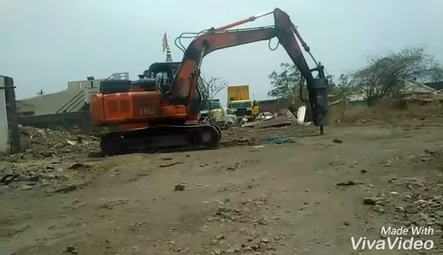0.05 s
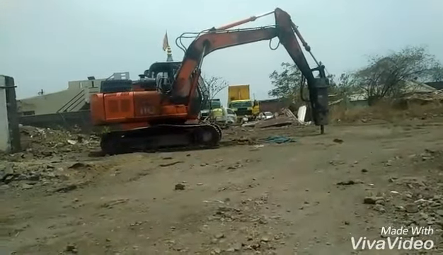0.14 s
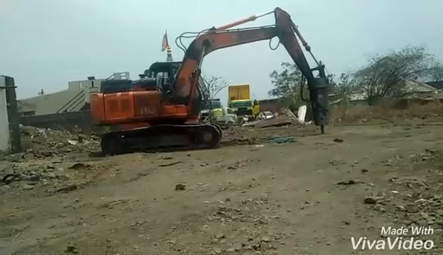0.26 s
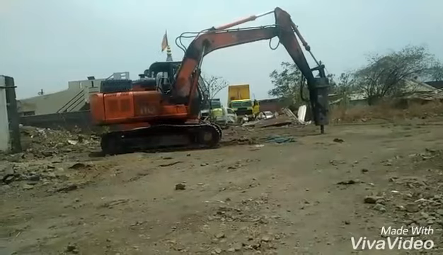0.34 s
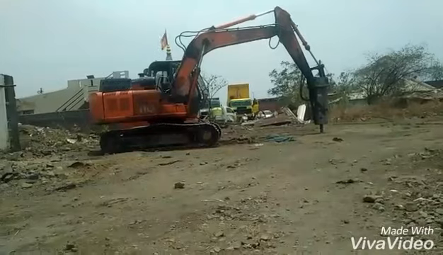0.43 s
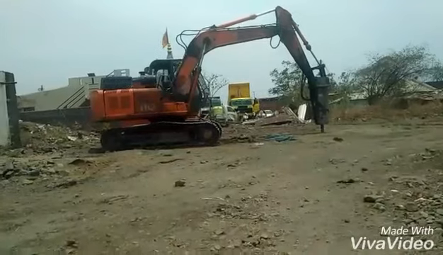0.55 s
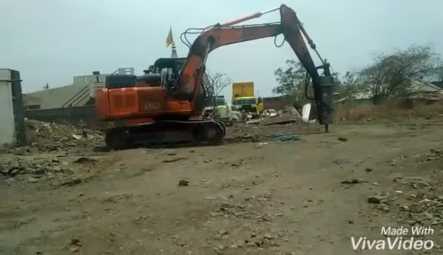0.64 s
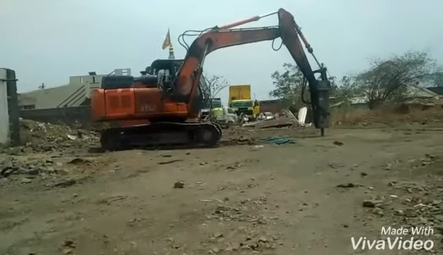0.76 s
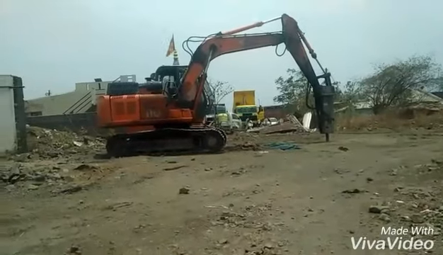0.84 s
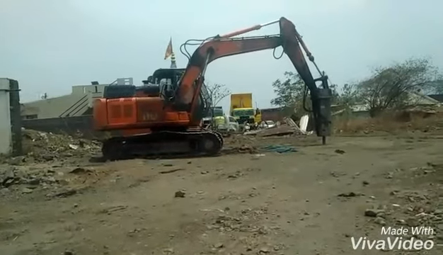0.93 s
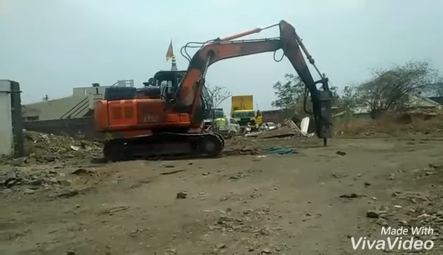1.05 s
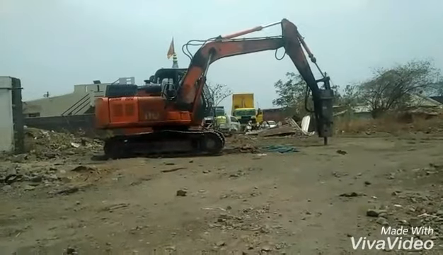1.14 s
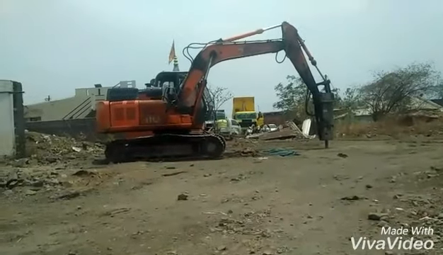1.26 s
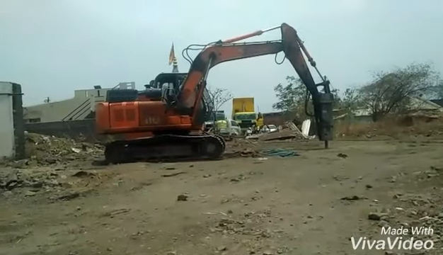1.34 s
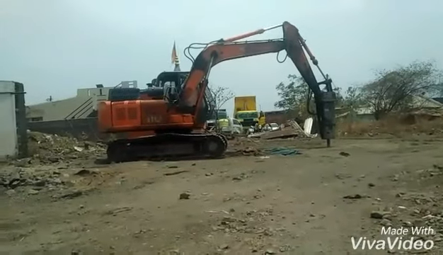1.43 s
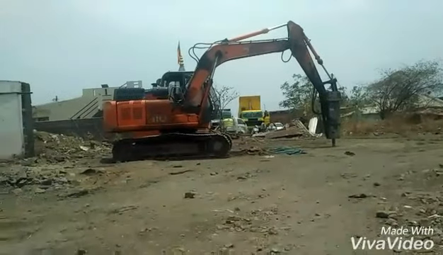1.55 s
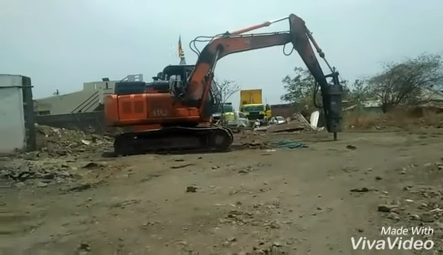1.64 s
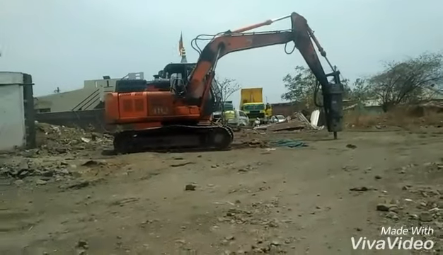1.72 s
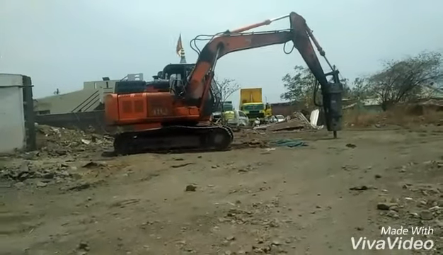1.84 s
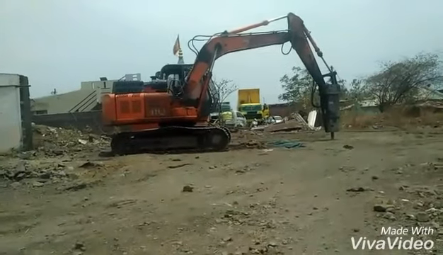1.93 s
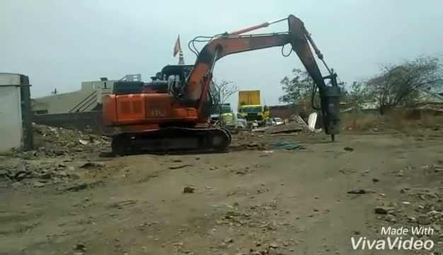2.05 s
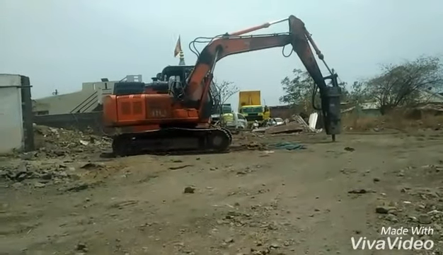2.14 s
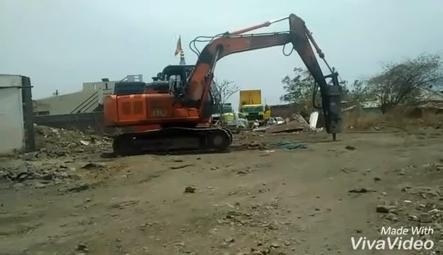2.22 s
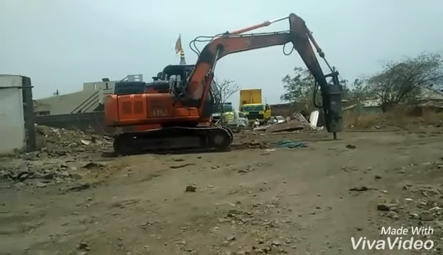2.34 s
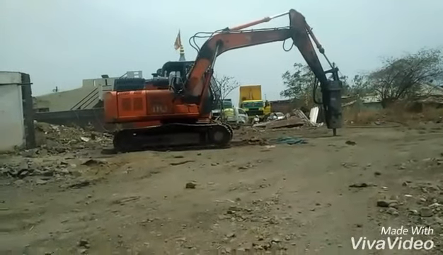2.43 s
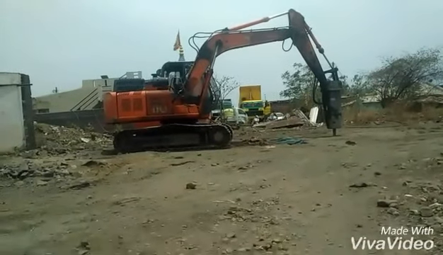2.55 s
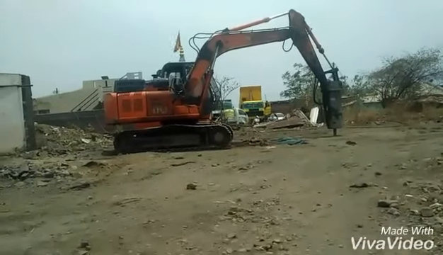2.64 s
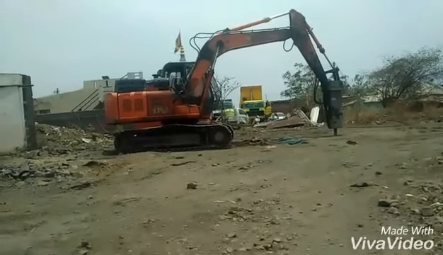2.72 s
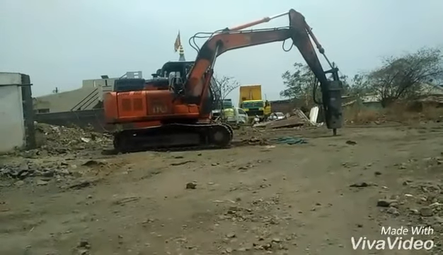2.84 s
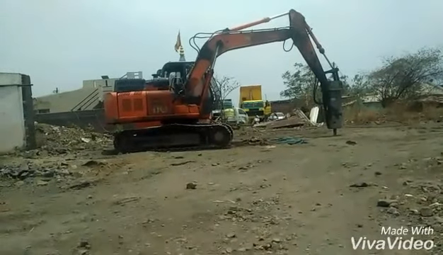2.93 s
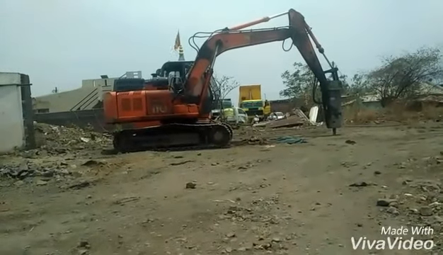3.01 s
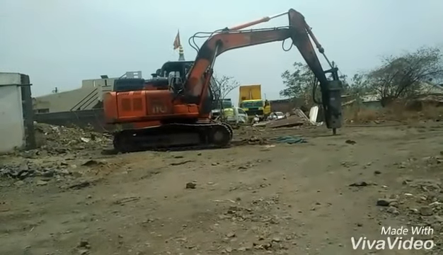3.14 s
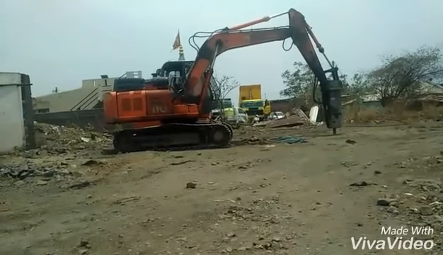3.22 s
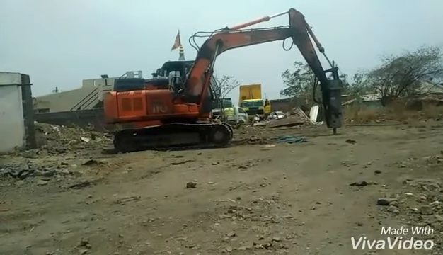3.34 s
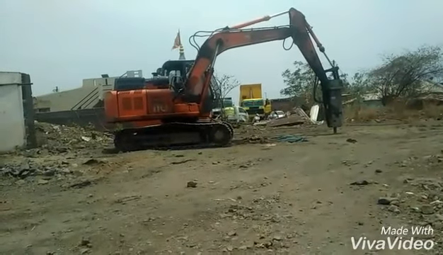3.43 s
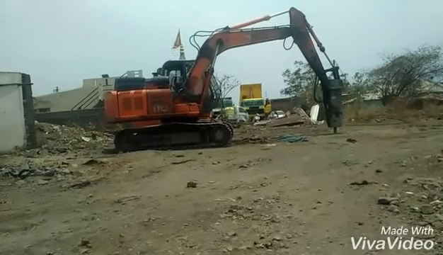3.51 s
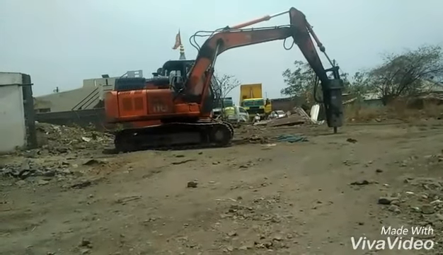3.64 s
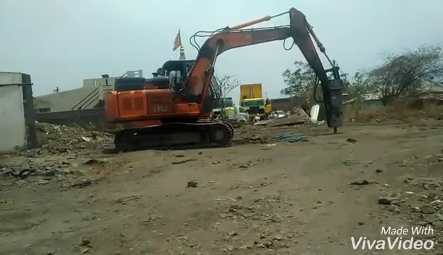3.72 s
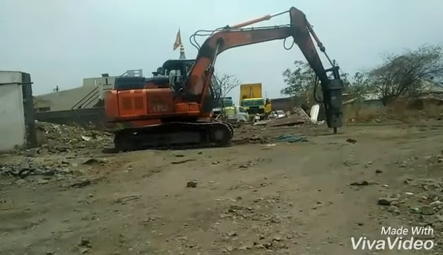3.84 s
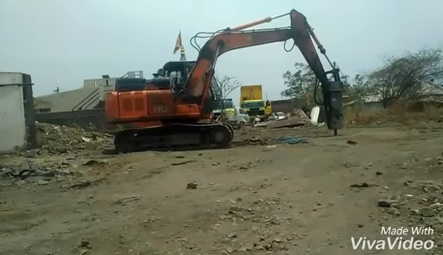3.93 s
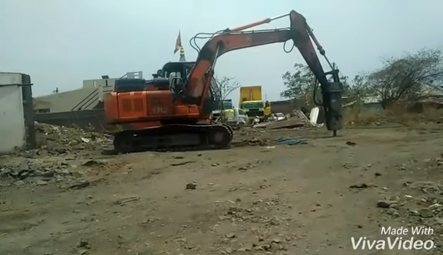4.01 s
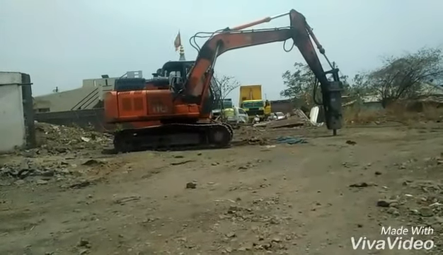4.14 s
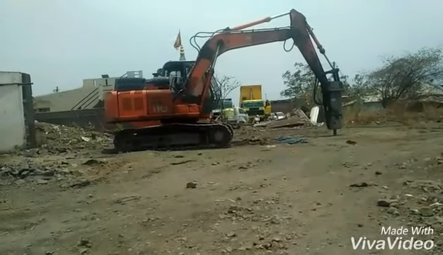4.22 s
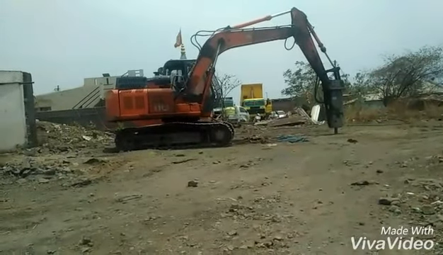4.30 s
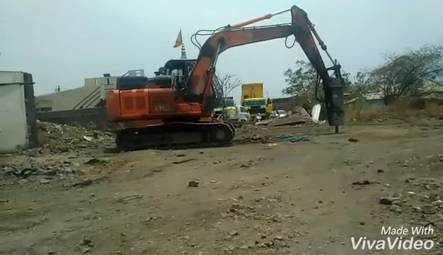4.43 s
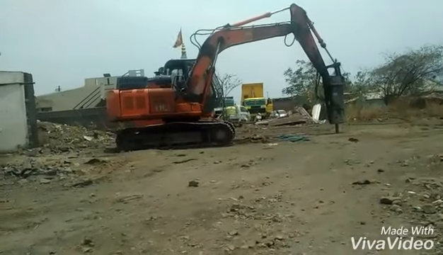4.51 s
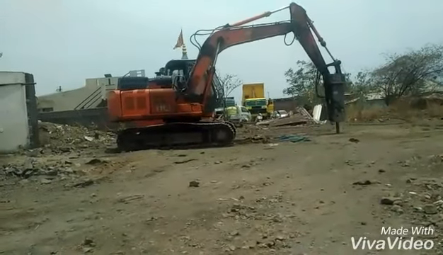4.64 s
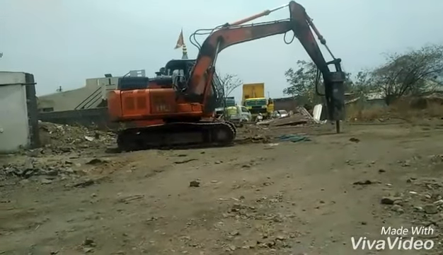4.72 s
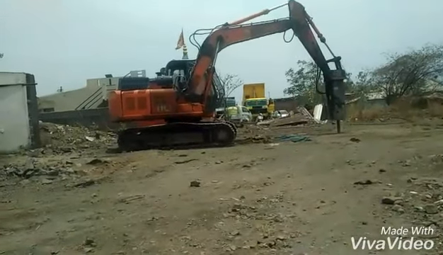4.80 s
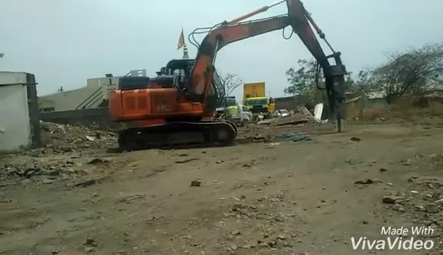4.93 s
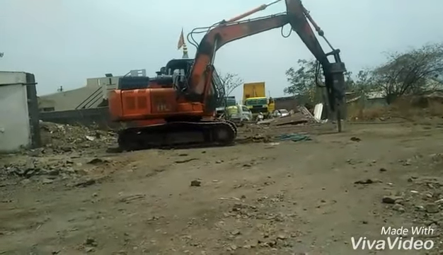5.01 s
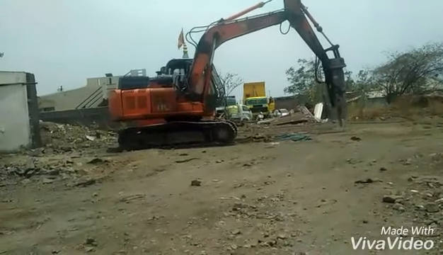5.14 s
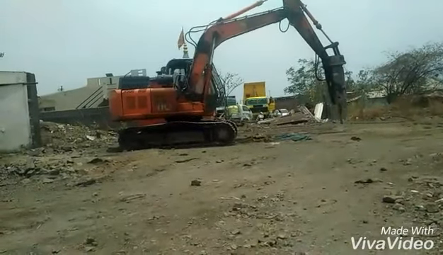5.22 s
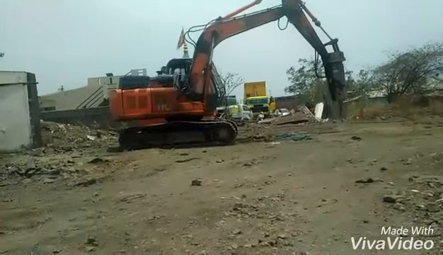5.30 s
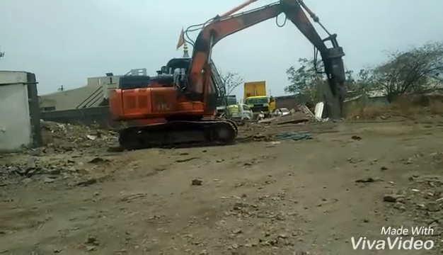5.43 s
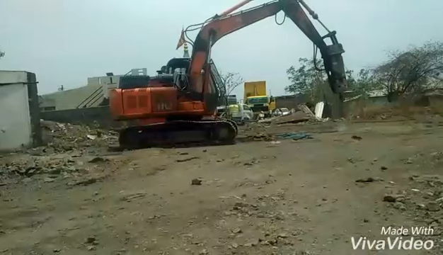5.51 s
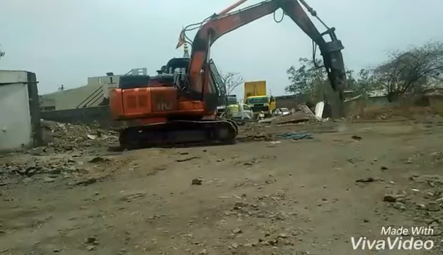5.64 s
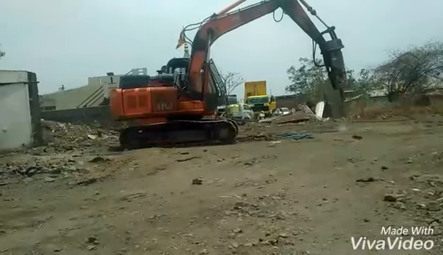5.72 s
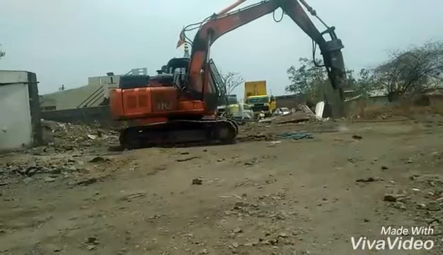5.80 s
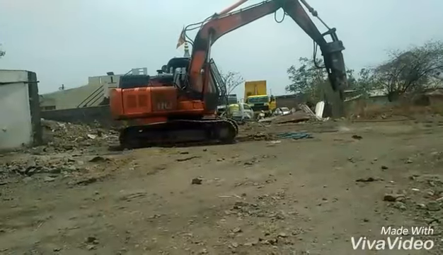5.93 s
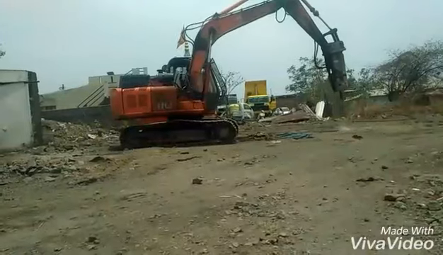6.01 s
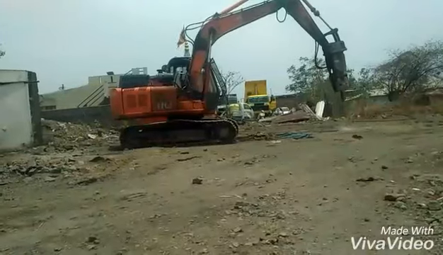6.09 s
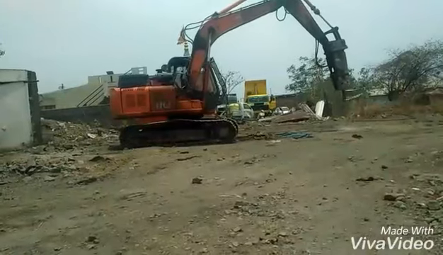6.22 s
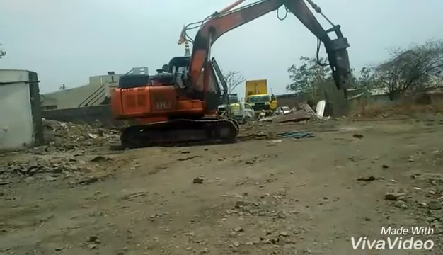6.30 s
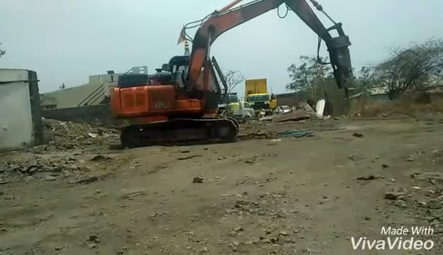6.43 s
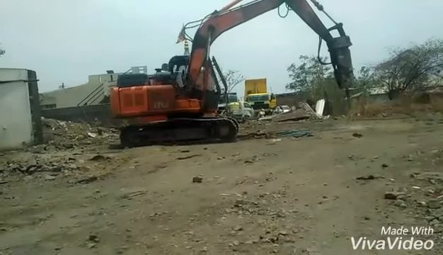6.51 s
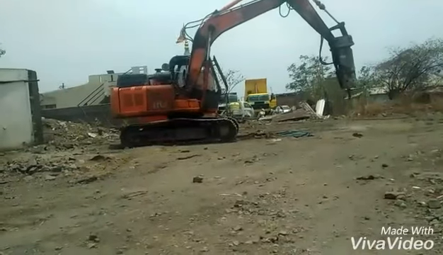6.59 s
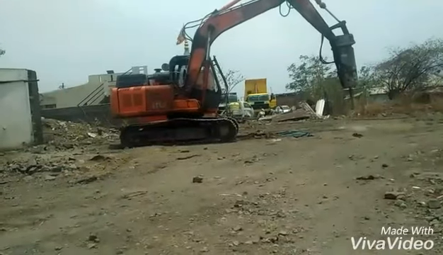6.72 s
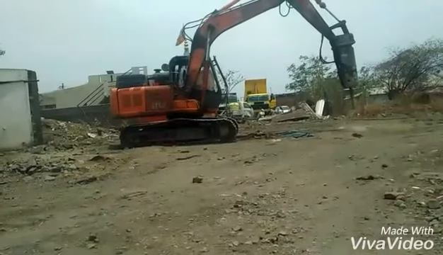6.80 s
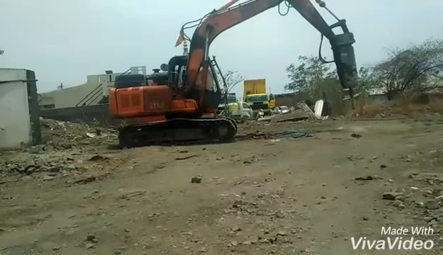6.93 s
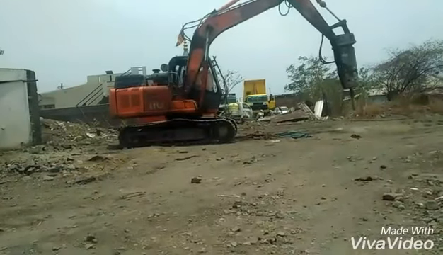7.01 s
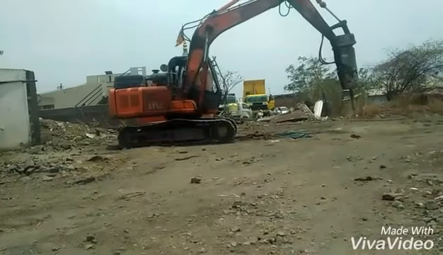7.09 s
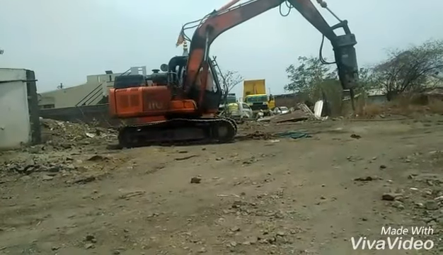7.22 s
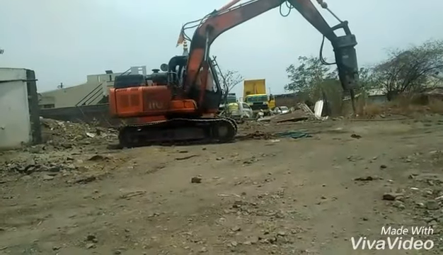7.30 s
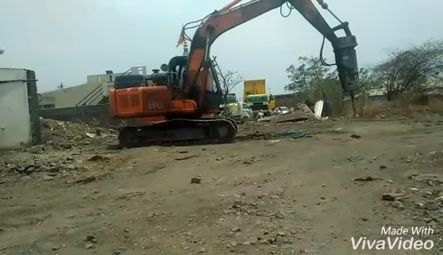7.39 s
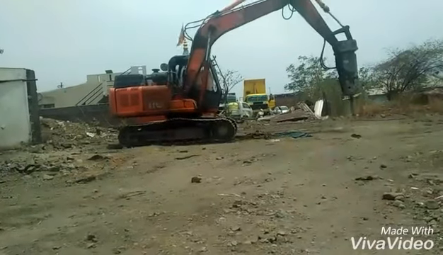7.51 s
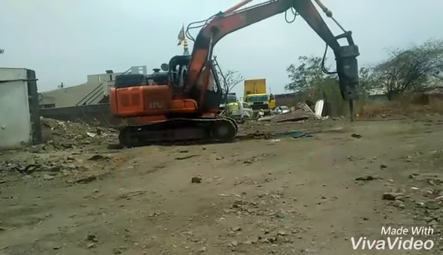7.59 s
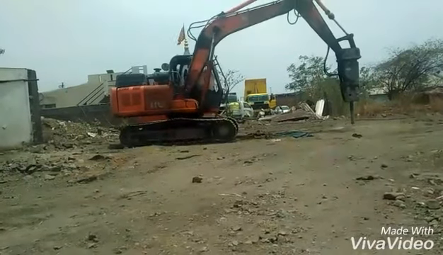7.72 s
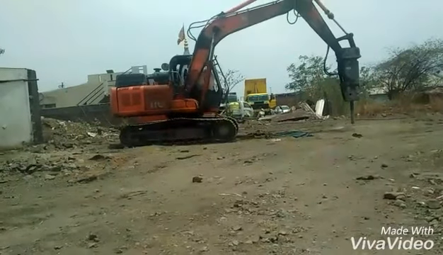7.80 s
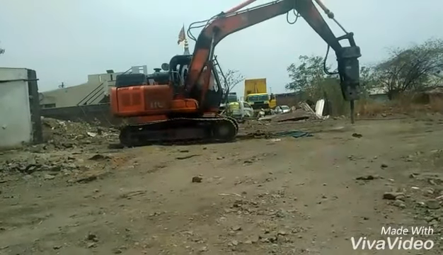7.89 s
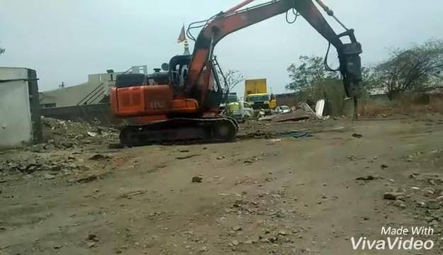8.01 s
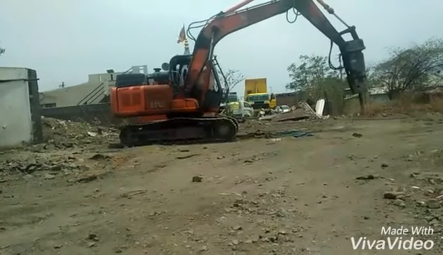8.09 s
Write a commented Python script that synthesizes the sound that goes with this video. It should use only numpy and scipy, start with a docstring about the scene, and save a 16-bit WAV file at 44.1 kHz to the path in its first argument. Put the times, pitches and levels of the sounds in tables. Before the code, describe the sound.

Outdoors on open rubble ground, an excavator's breaker pounds about seven times a second, each loud blow a bright tick, steel crash and short ringing rebound. It pauses briefly, leaving the diesel drone, then hammers again. Afterwards the arm lifts with clanks, the engine growls under load, hisses and whines. One distant microphone, about twenty metres away, with peaks squashed.

```python
"""Hydraulic breaker at twenty metres

A hydraulic breaker on an excavator pounds the ground some twenty metres from the microphone, in two bursts.
Each cycle is a bright valve tick, the blow on the steel and a rebound, built from ringing modes.
Arm and casing ring on, and a broad crash of filtered noise dies away into the echo of the site.
Behind it the diesel drones in sine orders, with a puff of hiss and a knock at every firing.
Loose steel clanks while the arm is raised; a fast limiter ducks everything under each blow."""
import sys
import numpy as np
from scipy import signal
from scipy.fft import rfft, irfft
from scipy.io import wavfile

SR = 44100
rng = np.random.default_rng(int(sys.argv[2]) if len(sys.argv) > 2 else 0)


def master_out(mix):
    """Clip the mix to full scale and print it as 16-bit PCM to the path in sys.argv[1]."""
    frames = np.transpose(np.atleast_2d(mix))
    ceiling = np.clip(frames, -1, 1)
    pcm = np.round(ceiling * 32767).astype(np.int16)
    wavfile.write(sys.argv[1], SR, pcm)


N = 359415

# Piston on tool; bite is how deep the tool sits in the ground.
# Columns: t/s, relative peak level/dB, bite (0-1), low ring level/dB, relative rebound level/dB
BLOWS = [(-0.089, -1, 0, -12, -14), (0.056, -2.5, 0.06, -8, -5), (0.202, -3.5, 0, 1, -9),
         (0.348, -3, 0.03, 7.5, -15), (0.493, -2.5, 0.1, -1, -3), (0.639, -3, 0, 10.5, -21),
         (0.784, -3.5, 0.04, 8, -24), (0.929, -4.5, 0.03, -7, -31), (1.074, -3.5, 0.09, 5, -26),
         (1.221, -4, 0, 3, -8), (1.366, -3.5, 0, 0, -16), (1.511, -3.5, 0.04, 5, -10),
         (1.658, -4.5, 0.06, 4, -14), (1.803, -3, 0.17, 3.5, -3), (1.949, -4, 0.08, 2.5, -9),
         (2.096, -4.5, 0.17, -3.5, -3), (2.787, -4.5, 0.2, 11, -12), (2.935, -3.5, 0.48, -1, -5),
         (3.081, -4.5, 0.7, 3, 1), (3.227, -6.5, 0.83, -1, -6), (3.372, -7, 1, -12, -2),
         (3.52, -7, 0.9, -13, -3), (3.665, -5, 0.83, -3, -1.5), (3.813, -4.5, 0.55, 6.5, -1),
         (3.958, -3.5, 0.36, 10, -3), (4.104, -4.5, 0.13, 8.5, -7)]


def from_db(db):
    """Decibels to gain."""
    return 10 ** (np.asarray(db) / 20)


def rms_one(x):
    """Scale to unit rms."""
    return x / np.sqrt(np.mean(x ** 2) + 1e-20)


def in_time(rows):
    """Columns of a curve table, one value per sample."""
    s, *columns = np.transpose(rows)
    return [np.interp(np.arange(N) / SR, s, column) for column in columns]


def at_hz(points, hz):
    """Read a table on a log-frequency axis."""
    table_hz, values = np.transpose(points)
    return np.interp(np.log(hz), np.log(table_hz), values)


def bandpass(x, order, low_hz, high_hz):
    """Butterworth band between two edges."""
    return signal.sosfilt(signal.butter(order, [low_hz, high_hz], "band", fs=SR, output="sos"), x)


def drift(rate_hz):
    """Slow chance of spread 1: noise through a two-pole lowpass, drawn at every 40th sample."""
    step = 40
    r = np.exp(-2 * np.pi * rate_hz * step / SR)
    white = rng.standard_normal(N // step + 2002)
    slow = signal.lfilter([1], [1, -2 * r, r * r], white)[2000:]   # skip the run-in
    return np.interp(np.arange(N) / step, np.arange(len(slow)), rms_one(slow))


def shaped(white, spectrum):
    """White noise given a spectrum, closed outside its ends, at unit rms."""
    length = white.shape[-1]
    hz = np.maximum(np.fft.rfftfreq(length, 1 / SR), 1)
    inside = (hz > spectrum[0][0]) & (hz < spectrum[-1][0])
    return rms_one(irfft(rfft(white) * from_db(at_hz(spectrum, hz)) * inside, length))


def patchy(x, edges_hz, depth_db):
    """Split into bands that each swell and sink on their own."""
    mixed = 0
    for k, (low, high) in enumerate(zip(edges_hz, edges_hz[1:])):
        sign = (-1) ** k   # alternate signs keep the crossovers level
        mixed = mixed + sign * from_db(depth_db * drift(9.3)) * bandpass(x, 2, low, high)
    return mixed


def ring(push, hz, t60):
    """A damped mode: a unit click sets a sine of height 1 ringing."""
    r, w = from_db(-60 / (t60 * SR)), 2 * np.pi * hz / SR
    return signal.lfilter([0, np.sin(w)], [1, -2 * r * np.cos(w), r * r], push + 1e-18)


def struck(push, hz, t60):
    """Rows of an uneven push through one mode, each scaled to a height of 1."""
    rung = ring(push, hz, t60)
    return rung / np.abs(rung).max(axis=-1, keepdims=True)


def place(times, sounds):
    """Lay one sound per row at its time; a sound may have begun up to a second ago."""
    out = np.zeros(SR + N + sounds.shape[1])
    for s, sound in zip(times, sounds):
        start = SR + round(s * SR)
        out[start:start + len(sound)] += sound
    return out[SR:SR + N]


def firing_window(cycles, width):
    """A bell in each firing cycle, centred on the pressure dip half a cycle in."""
    return np.exp(-.5 * ((cycles % 1 - .5) / width) ** 2)


def firing_strength(cycles, spread_db):
    """One chance gain per firing, held for its whole cycle."""
    firing = cycles.astype(int)
    return from_db(spread_db * rng.standard_normal(firing[-1] + 1))[firing]


def firing_cycles():
    """Firings counted since the start: the diesel sags under load and is slightly unsteady."""
    # Columns: t/s, firing rate/Hz
    speed_curve = [(0, 84.6), (2.0, 84.7), (2.25, 87.4), (2.55, 88.8), (2.85, 85.8), (4.05, 85.7),
                   (4.35, 88.6), (4.65, 85.3), (4.95, 80.8), (5.25, 83.2), (5.55, 82.9), (6.15, 83.6),
                   (6.45, 83.1), (7.05, 83.8), (7.65, 86.9), (7.95, 83.6), (8.15, 82)]
    (speed,) = in_time(speed_curve)
    return np.cumsum(speed * (1 + 0.00186 * drift(2.54))) / SR


def fan_hiss():
    """Steady faint treble of the cooling fan, as shaped noise."""
    spectrum = [(5000, -6), (6500, -2), (8500, 2.5), (11000, -5), (12800, -20)]   # f/Hz, relative level/dB
    return from_db(-65) * shaped(rng.standard_normal(N), spectrum)


def engine_rumble(swing_db):
    """Low noise of the engine, which partly follows the load and wavers."""
    # Columns: f/Hz, relative level/dB per Hz
    spectrum = [(12, -53), (20, -10), (37, -5.5), (86, -12), (129, -12.5), (172, 1), (274, 1), (335, -4.5),
                (375, -20.5), (436, -3.5), (520, -50), (680, -51), (1140, -120)]
    level_db = -43.5 + 0.31 * swing_db + 2.66 * drift(6.1)
    return from_db(level_db) * shaped(rng.standard_normal(N), spectrum)


def panel_clatter(cycles):
    """Engine and panels clatter in time with the firings, shaken harder while the breaker runs."""
    # Columns: f/Hz, relative level/dB per Hz
    spectrum = [(220, -9), (380, -74), (436, 3.5), (516, -6), (765, -2.5), (827, -6.5), (1120, -1.5),
                (1440, -1.5), (1550, -2), (1950, -11.5), (2170, -7), (3160, -21), (4000, -28),
                (5200, -15.5), (8800, -120)]
    # Columns: t/s, level/dB
    level_curve = [(0, -34), (2.15, -36.5), (2.32, -46), (2.72, -46), (2.85, -32.5), (4.15, -33),
                   (4.32, -43.5), (4.6, -45), (4.95, -38), (5.36, -43.5), (5.8, -41.5), (6.25, -39.5),
                   (6.47, -35), (6.67, -40.5), (7.06, -40), (7.2, -38.5), (7.8, -39.5), (8.15, -35.5)]
    beat = 1 + .5 * firing_window(cycles, 0.65) * firing_strength(cycles, 2.7)
    noise = shaped(rng.standard_normal(N) * beat, spectrum)
    noise = rms_one(patchy(noise, np.geomspace(350, 5000, 10), depth_db=1.1))
    (level_db,) = in_time(level_curve)
    return from_db(level_db) * noise


def drone(cycles, load_db, swing_db):
    """The firing rate and its two multiples as sines; the upper two swing less and wander."""
    # Base levels of orders 2 and 3 under the mean of the first: level/dB
    upper_db = [-9, -12]
    # Phase of orders 1 to 3, so that firings are sharp dips: phase/turns
    phases = [0, 0.015, 0.13]
    follows, wander_db = .8, 1.3   # share of the load swing; spread in dB
    orders_db = [load_db]
    for db in upper_db:
        orders_db.append(load_db.mean() + db + follows * swing_db + wander_db * drift(4.8))
    total = 0
    for k, (db, phase) in enumerate(zip(orders_db, phases)):
        gain = (-1) ** k * np.sqrt(2) * from_db(db + 0.28 * drift(27))
        total = total + gain * np.cos(2 * np.pi * ((k + 1) * cycles + phase))
    return total


def pump_whine(cycles):
    """The hydraulic pump whines at 9 and 27 times the firing rate, as two wavering sines."""
    # Columns: t/s, level of order 9/dB, level of order 27/dB
    level_curves = [(4.6, -70, -65), (5.2, -67, -71), (5.6, -55, -56.5), (6.1, -52, -58), (6.5, -51.5, -57),
                    (7.2, -57, -83), (7.8, -55.5, -56), (8.15, -52, -58)]
    total = 0
    for order, db in zip((9, 27), in_time(level_curves)):
        total = total + np.sqrt(2) * from_db(db + 1.0 * drift(3.3)) * np.sin(2 * np.pi * order * cycles)
    return total


def exhaust_and_knock(cycles, swing_db):
    """Each firing lets out a puff of hiss and a ringing knock; both are strong or weak together."""
    # Exhaust hiss spectrum. Columns: f/Hz, relative level/dB per Hz
    spectrum = [(3410, -35), (5800, -39), (6020, -19), (7100, -14.5), (8000, -4.5), (9190, -3),
                (10300, -6.5), (12300, -23.5), (16000, -55), (22000, -120)]
    # Exhaust hiss under load as the arm moves. Columns: t/s, level/dB
    level_curve = [(4.4, -82), (4.57, -74), (4.75, -49), (5.05, -47), (5.16, -43.5), (5.34, -44.5),
                   (5.45, -56.5), (5.54, -50), (5.63, -42), (5.8, -49), (6.08, -46.5), (6.22, -65),
                   (6.32, -53), (6.43, -42.5), (6.68, -56), (6.81, -70), (6.88, -53.5), (7.09, -59),
                   (7.16, -47.5), (7.5, -62), (7.88, -69), (7.94, -55), (8.02, -46), (8.15, -49.5)]
    (hiss_db,) = in_time(level_curve)
    force = 2.2 * firing_strength(cycles, 2.5)   # puffs over the steady noise

    pushes = rng.standard_normal(N) * (1 + force * firing_window(cycles, 0.06))
    knock = ring(pushes, 4830, 0.0047) + 0.48 * ring(pushes, 5390, 0.0079) + 0.24 * ring(pushes, 3200, 0.0032)
    knock = rms_one(patchy(knock, [3050, 4360, 4950, 7240], depth_db=4))
    # a level that follows the load a little, joined by one 6 dB under the hiss
    knock_gain = np.hypot(from_db(-63 + 0.19 * swing_db), from_db(hiss_db - 6))

    puffs = rng.standard_normal(N) * (1 + force * firing_window(cycles, 0.1))
    hiss = shaped(puffs, spectrum) * from_db(0.35 * drift(9.4))
    return knock_gain * knock + from_db(hiss_db) * hiss


def diesel():
    """Drone, whine, clatter, knock and exhaust run on one count of firings; rumble, drone and knock
    follow the load; the fan hiss is steady."""
    # Diesel load, heard as the level of the first order. Columns: t/s, level/dB
    load_curve = [(0, -36), (1.25, -35), (2.18, -36.5), (2.38, -48.5), (2.72, -45), (2.81, -34),
                  (2.97, -29.5), (3.6, -30), (4.2, -33.5), (4.34, -47), (4.5, -47), (4.78, -30.5),
                  (5.25, -24.5), (5.4, -26.5), (5.61, -23.5), (6.08, -29), (6.24, -33), (6.56, -32),
                  (7.2, -36), (7.83, -42), (7.97, -29.5), (8.06, -26), (8.15, -25.5)]
    (load_db,) = in_time(load_curve)
    swing_db = load_db - load_db.mean()
    cycles = firing_cycles()
    noises = fan_hiss() + engine_rumble(swing_db) + panel_clatter(cycles)
    tones = drone(cycles, load_db, swing_db) + pump_whine(cycles)
    return noises + tones + exhaust_and_knock(cycles, swing_db)


def scraped(events, overtones, scrape_s):
    """Each knock is a short uneven scrape, swelling and fading, that rings around its own pitch."""
    grit_db = -22   # broad scrape heard through each knock
    t = np.arange(SR // 3) / SR
    sounds = []
    for s, level_db, hz, t60 in events:
        scrape = rng.standard_normal(len(t)) * t / scrape_s * np.exp(-t / scrape_s)
        partials = sum(from_db(db) * struck(scrape, hz * ratio, t60 / ratio) for ratio, db in overtones)
        grit = from_db(grit_db) * struck(scrape, 1.5 * min(hz, 2000), 0.0013)
        sounds.append(from_db(level_db) * (partials + grit))
    return place(np.array(events)[:, 0] - scrape_s, np.array(sounds))


def loose_steel():
    """Clanks and sharp ticks as the arm moves, and one faint priming tick before the second burst."""
    # Dull clanks of steel and rubble. Columns: t/s, relative peak level/dB, f/Hz, t60/s
    clanks = [(4.63, -25, 1076, 0.045), (4.659, -25, 1030, 0.11), (4.715, -18, 1226, 0.048),
              (4.837, -16.5, 1028, 0.075), (4.954, -22.5, 723, 0.32), (4.97, -15.5, 1484, 0.1),
              (4.999, -13, 682, 0.094), (5.042, -19, 645, 0.1), (5.089, -23.5, 640, 0.13),
              (6.169, -22, 1100, 0.04), (6.26, -19, 940, 0.077), (6.289, -22, 734, 0.061),
              (6.349, -27, 1130, 0.058), (6.429, -19, 1630, 0.023), (6.429, -16.5, 618, 0.087),
              (6.469, -18.5, 657, 0.065), (6.504, -21, 620, 0.06), (6.539, -22.5, 587, 0.11),
              (6.572, -21.5, 1130, 0.1), (6.919, -24.5, 1156, 0.059), (7.141, -23.5, 996, 0.047),
              (7.289, -27, 1045, 0.077), (7.499, -23, 1117, 0.043), (7.972, -26, 1250, 0.075),
              (8.07, -20.5, 1120, 0.2)]
    # Sharp ticks, the priming tick first. Columns: t/s, relative peak level/dB, f/Hz, t60/s
    clinks = [(2.694, -41, 4380, .06), (4.7152, -34.5, 4950, 0.053), (4.838, -29, 4570, 0.035),
              (4.862, -28, 4770, .03), (4.9673, -30, 4620, 0.13), (5.6594, -29, 4900, 0.036),
              (6.4268, -36, 4360, 0.03), (6.8593, -42, 4500, 0.02), (6.957, -39, 5050, .02),
              (7.1422, -32.5, 4200, 0.02), (7.19, -42, 4300, .03)]
    # overtones: pitch ratio, level/dB
    dull = scraped(clanks, [(.93, -29), (1, -7), (1.1, -20.5), (2.2, -27.5), (2.7, -29)], scrape_s=0.0091)
    sharp = scraped(clinks, [(.85, -12), (1, -2.5), (1.1, -20)], scrape_s=0.0014)
    return dull + sharp


def strikes(events, contacts, modes, soft_s, sweep_s, spread_db):
    """Each event is a row of soft grinding contacts, partly alike each time, that sets modes ringing."""
    s, level_db, lowest_db = np.transpose(events)
    t = np.arange(SR // 3) / SR - .005   # room for contacts ahead of the event
    grind = rng.standard_normal(len(t)) + 1.3 * rng.standard_normal((len(s), len(t)))
    strength = from_db(spread_db * rng.standard_normal((len(s), len(modes))))
    strength[:, 0] *= from_db(lowest_db)
    first_hz, last_hz = modes[0][0], modes[-1][0]
    sounds = 0
    for k, (hz, mode_db, t60) in enumerate(modes):
        lag = sweep_s * (first_hz / hz) ** 4   # low modes answer later
        pushes = sum(from_db(db) * np.exp(-.5 * ((t - lag - delay) / soft_s) ** 2) for delay, db in contacts)
        sounds = sounds + from_db(mode_db) * strength[:, [k]] * struck(pushes * grind, hz, t60)
    sounds = bandpass(sounds, 5, first_hz, 1.17 * last_hz)   # little radiates outside the span of the modes
    return place(s + t[0], from_db(level_db[:, None]) * sounds)


def valve_ticks():
    """The valve ticks brightly ahead of each blow; its lowest mode grows with bite."""
    # Contacts within one tick. Columns: delay/s, level/dB
    contacts = [(-.0004, -0.5), (.0022, 2.5), (.009, -6.5), (.015, -5)]
    # Columns: f/Hz, level/dB, t60/s
    modes = [(3805, 0.5, 0.055), (4020, -25, 0.04), (4600, -21, .025), (4570, 4, 0.03), (5000, -2.5, 0.029),
             (4630, -5, 0.0099), (4740, -8, 0.033), (5220, 3, 0.02), (5600, -49, 0.011),
             (6420, -17.5, 0.14), (8280, -16, 0.056), (9460, -8.5, 0.01)]
    lead_s, level_db = 0.021, -18.5
    events = [(s - lead_s, level_db, -16 + 4 * bite) for s, _, bite, *_ in BLOWS]
    return strikes(events, contacts, modes, soft_s=0.0015, sweep_s=0.0033, spread_db=3.5)


def rebounds():
    """The tool rebounds in its bushing after each blow; its low mode is weaker the harder it rebounds."""
    # Columns: f/Hz, level/dB, t60/s
    modes = [(620, 3, 0.033), (617, -11, 0.032), (1130, -23, 0.14), (1660, -4, 0.025), (2075, -9, 0.09),
             (2270, -7.5, 0.051), (2490, 0.5, 0.013), (2664, -13, 0.081)]
    lag_s, trim_db = 0.031, -11.5
    events = [(s + lag_s, db + trim_db, -4 - db) for s, *_, db in BLOWS]
    contacts = [(0, -2), (.003, -11.5)]   # delay/s, level/dB
    return strikes(events, contacts, modes, soft_s=0.0025, sweep_s=0.0057, spread_db=5.0)


def crash_of_blow(white, t, colour_gain):
    """Dense small modes as noise: each band holds, dies at its own rate and sinks into the site echo."""
    # Columns: f/Hz, relative level/dB per Hz
    spectrum = [(35, -37), (60, 4.5), (128, 1.5), (334, -133), (596, -18.5), (814, -12.5), (1160, 0.5),
                (1700, -8.5), (1980, 0), (3390, -12), (4630, 4), (6610, -14), (8830, -10.5), (10300, -20),
                (12300, -38), (16000, -80), (22000, -120)]
    # Columns: f/Hz, t60/s
    decay = [(100, 0.054), (500, 0.42), (1500, 0.13), (3000, 0.22), (5000, 0.12), (8000, 0.052),
             (12000, 0.088)]
    # Site echo under the crash. Columns: f/Hz, level/dB
    echo_tilt = [(300, -19), (1000, -16.5), (3000, -16), (6000, -24.5), (9000, -10), (12000, -22.5)]
    echo_t60_s, echo_rise_s = 0.6, 0.0053
    noise = shaped(white, spectrum)
    edges_hz = 50 * 2 ** np.arange(0, 8.6, .5)   # half octaves
    crash = 0
    for k, (low, high) in enumerate(zip(edges_hz, edges_hz[1:])):
        hz = np.sqrt(low * high)
        hold_s = 0.016 * 1000 / (hz + 1000)   # the blow holds before it dies, longest in the bass
        rise = 1 - np.exp(-t * hz / 10)   # low bands build up more slowly
        direct = from_db(-60 * np.maximum(t - hold_s, 0) / at_hz(decay, hz)) * rise
        echo = from_db(at_hz(echo_tilt, hz) - 60 * t / echo_t60_s) * (1 - np.exp(-t / echo_rise_s))
        band = bandpass(noise * np.hypot(direct, echo), 2, low, high)
        crash = crash + (-1) ** k * colour_gain(hz) * band   # alternate signs keep the crossovers level
    return crash


def ringing_steel(white, t, colour_gain):
    """Arm, casing and tool shake for a moment, which feeds their modes; the ringing is damped soon after."""
    # Mode pitches: f/Hz
    modes_hz = [473, 613, 655, 721, 893, 958, 1000, 1162, 1245, 1399, 1470, 1985, 2088, 2200, 2390, 2630,
                2777, 4155, 4414, 4543, 5110, 5330]
    # The same modes in order. Columns: level/dB, t60/s
    modes = [(-5, 0.27), (0, 0.53), (-4.5, 0.61), (-18, 0.38), (-6, 0.5), (4, 0.17), (-7.5, 0.54),
             (11.5, 0.099), (-26, 0.056), (-4, 0.27), (3.5, 0.16), (-15, 0.13), (-8, 0.24), (-10, 0.14),
             (-10.5, 0.11), (3, 0.064), (1.5, 0.13), (3.5, 0.23), (-29, 0.13), (-6, 0.22), (-35, 0.26),
             (-32, 0.19)]
    shake_s, spread_db = 0.012, 1.5   # each blow catches each mode differently
    damp_s, damp_db_per_s = .075, 320   # the ringing is damped soon after the blow
    shake = white * np.exp(-t / shake_s)
    steel = 0
    for hz, (level_db, t60) in zip(modes_hz, modes):
        catch_db = spread_db * rng.standard_normal((len(white), 1))
        steel = steel + from_db(level_db + catch_db) * colour_gain(hz) * struck(shake, hz, t60)
    damped = steel * from_db(-damp_db_per_s * np.maximum(t - damp_s, 0))
    no_bass = signal.butter(8, 440, "high", fs=SR, output="sos")   # the steel radiates no bass
    return signal.sosfilt(no_bass, damped)


def blows():
    """Each blow sends one noise into crash and steel, coloured by how deep the tool bites."""
    # Columns: f/Hz, level with the tool on the surface/dB, level added at full bite/dB
    colour = [(130, -6.5, 13), (473, 0, -1.5), (620, -1, 7), (1040, 0.5, -19), (2100, -0.9, 2.5),
              (3460, -7.5, -7.5), (4230, -10.5, 10.5), (4720, -6.5, -2.5), (8700, -7, 0.5),
              (11260, -1, 9.5)]
    colour_spread_db = 0.15   # chance colour from blow to blow
    sameness = 0.49   # share of the noise power that repeats from blow to blow
    s, peak_db, bite, low_ring_db, _ = np.transpose(BLOWS)
    t = np.arange(SR * 6 // 10) / SR
    common = rng.standard_normal(len(t))
    own = rng.standard_normal((len(s), len(t)))
    white = np.sqrt(sameness) * common + np.sqrt(1 - sameness) * own

    colour_hz, surface_db, bite_db = np.transpose(colour)
    chance_db = colour_spread_db * rng.standard_normal((len(s), len(colour)))
    colours_db = surface_db + bite[:, None] * bite_db + chance_db
    colours_db[:, 1] += low_ring_db   # the second point is the lowest steel mode

    def colour_gain(hz):
        """Gain of every blow at one frequency, as a column."""
        return from_db([[np.interp(np.log(hz), np.log(colour_hz), row)] for row in colours_db])

    crash = from_db(-3.0) * crash_of_blow(white, t, colour_gain)
    steel = from_db(-16) * ringing_steel(white, t, colour_gain)
    return place(s, from_db(peak_db[:, None]) * (crash + steel))


def scene():
    """Engine behind, loose steel, and the breaker in front, as one channel."""
    breaker = valve_ticks() + rebounds() + blows()
    return (diesel() + loose_steel() + breaker)[None]


def record(dry):
    """A fast limiter after the microphone ducks everything under each blow; peaks round off, the top is cut."""
    limit_db, share = -5, 0.57   # threshold; part of the overshoot taken off
    release_db_per_s, attack_s = 223, .003
    over_db = np.maximum(20 * np.log10(np.abs(dry) + 1e-9) - limit_db, 0)
    fall_db = release_db_per_s * np.arange(N) / SR
    held_db = np.maximum.accumulate(over_db + fall_db, axis=1) - fall_db
    r = np.exp(-1 / (attack_s * SR))
    duck_db = share * signal.lfilter([1 - r], [1, -r], held_db)
    rounded = np.tanh(dry * from_db(-duck_db))
    top_cut = signal.cheby2(10, 50, 12900, fs=SR, output="sos")   # 50 dB down from 12900 Hz up
    return signal.sosfilt(top_cut, rounded)


dry = scene()
out = record(dry)
master_out(out)
```